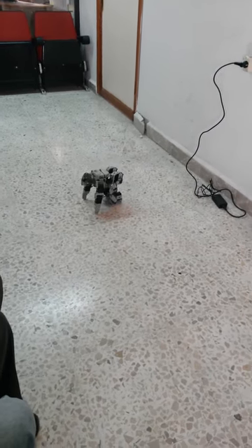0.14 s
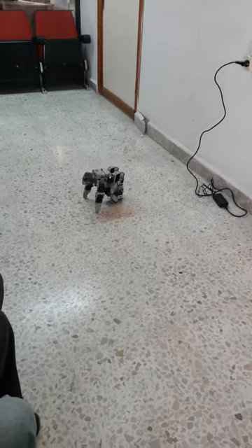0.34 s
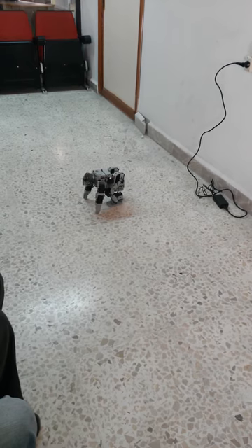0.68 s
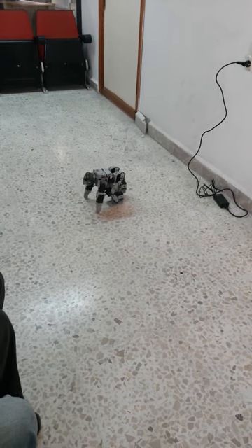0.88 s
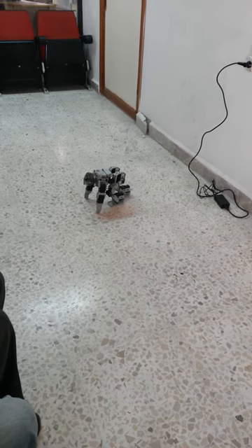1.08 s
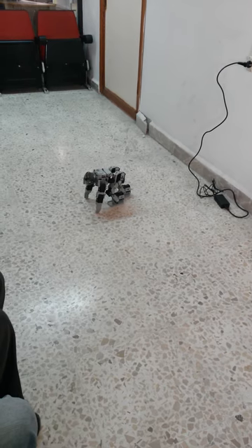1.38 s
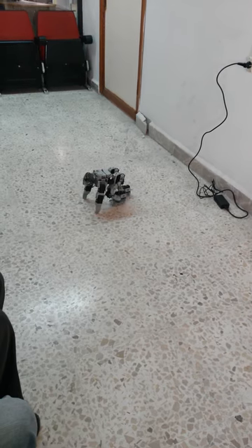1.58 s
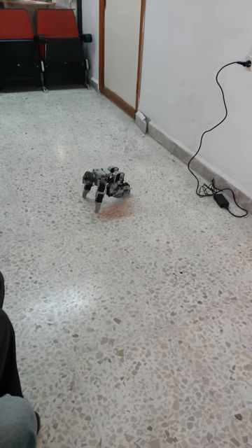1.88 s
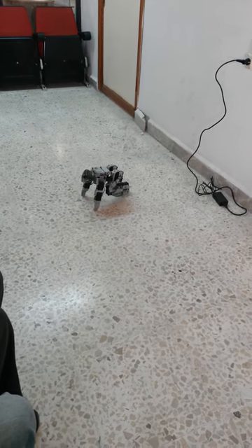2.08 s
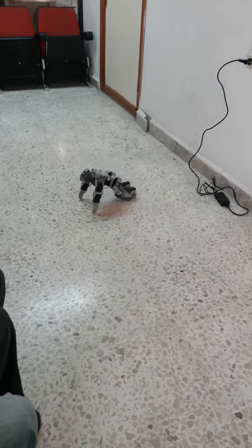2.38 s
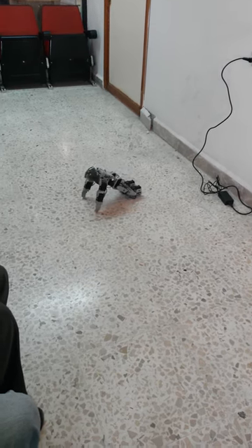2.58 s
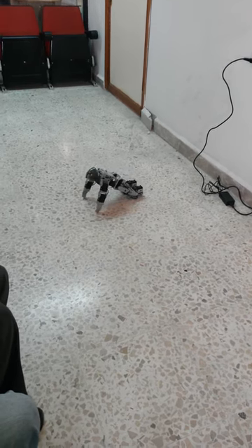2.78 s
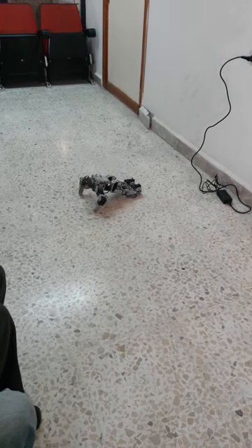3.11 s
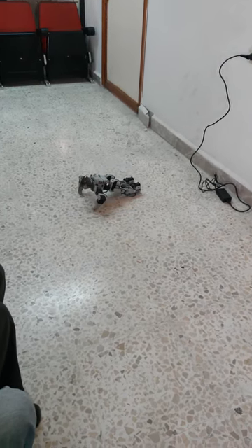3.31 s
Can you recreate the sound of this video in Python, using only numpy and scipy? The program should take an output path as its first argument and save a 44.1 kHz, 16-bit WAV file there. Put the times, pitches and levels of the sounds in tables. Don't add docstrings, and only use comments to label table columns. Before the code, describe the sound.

A small robot's plastic-cased servos make bright, rattling whirs with wavering gear whines, swelling and easing. A faint stroke comes near 0.5 s, a strong high one at 1.1 with soft foot knocks and a short drag, a softer one at 1.75. The loudest peaks at 2.4 with a scraping step, another strong whine follows at 3.05, then it fades. Bare room, faint house noise, phone two metres away.

```python
import sys
import numpy as np
from scipy import signal
from scipy.fft import rfft, irfft
from scipy.io import wavfile
from scipy.ndimage import uniform_filter1d, map_coordinates

SR = 44100
rng = np.random.default_rng(int(sys.argv[2]) if len(sys.argv) > 2 else 0)


def gain_from_db(level_db):
    decades = np.asarray(level_db, float) / 20
    return 10 ** decades


def log_audio(samples):
    frames = np.atleast_2d(samples).T
    limited = np.clip(frames, -1, 1)
    pcm = np.round(limited * 32767).astype(np.int16)
    wavfile.write(sys.argv[1], SR, pcm)


N = 152145
T = np.arange(N) / SR

# fastest moment, speed-up time and slow-down time in seconds, level in dB.
STROKES = [
    (-.1, .3, 0.34, -48.5),
    (0.498, 0.35, 0.3, -37.5),
    (1.088, .29, .38, -25.5),
    (1.758, 0.35, 0.34, -33),
    (2.388, 0.31, 0.37, -21.5),
    (2.549, 0.12, 0.027, -40.5),
    (3.058, 0.34, 0.32, -25),
    (3.7, 0.49, .3, -40),
]
# frequency in Hz, level in dB.
CASE_TONE = [(1000, -48.5), (1800, -27.5), (2300, -12), (3300, -8.5), (5000, -2), (7500, -1), (10000, -9),
             (14600, -20)]
# frequency in Hz, width in Hz, level in dB.
CASE_RINGS = [(6770, 300, -2.5), (4940, 900, -8)]
# frequency in Hz, level in dB.
GROAN_TONE = [(400, -26), (700, -5), (1000, -3.5), (1600, 2), (2300, -5.5), (3200, -38.5)]
# fastest moment, speed-up time and slow-down time in seconds,
# tooth-mesh pitch in Hz, strongest overtone in Hz.
WHINES = [
    (.47, .17, .3, 1245, 5000),
    (1.12, .22, .1, 2860, 4000),
    (1.13, .25, .09, 2300, 4600),
    (1.74, .19, .18, 1430, 5200),
    (2.38, .2, .1, 2440, 5400),
    (2.45, .1, .2, 2690, 6600),
    (2.5, .015, .08, 2700, 4600),
    (3.05, .19, .3, 2070, 5800),
]
WHINE_DB = [-43, -33, -31, -39, -29, -35, -24, -28]
# frequency in Hz, level in dB.
WHINE_TONE = [(1500, -14), (2100, -3), (2700, -5), (4000, 0), (6200, 2), (9000, 0)]
# start in seconds, length in seconds, thud level in dB, scrape level in dB.
FEET = [
    (1.009, 0.088, -54, -70.5),
    (1.094, 0.044, -42.5, -53),
    (1.218, 0.054, -45.5, -37),
    (1.514, 0.013, -49, -43.5),
    (2.347, 0.098, -35.5, -23),
    (2.522, 0.031, -42, -50),
    (2.98, 0.67, -53.5, -73),
]
# frequency in Hz, level in dB.
THUD_TONE = [(47, -70), (80, -15), (125, -1.5), (404, -11.5), (490, -10.5), (728, -11.5), (900, -23),
             (1170, -90), (1980, -120)]
# frequency in Hz, width in Hz, level in dB.
SCRAPE_RINGS = [(3200, 230, 21.5), (1830, 900, -42), (5750, 6000, 4)]
# start in seconds, end in seconds, frequency in Hz, width in Hz, level in dB.
HUMS = [(0.036, 0.506, 345, 30, -60), (1.11, 1.634, 640, 120, -54), (1.45, 2.55, 635, 59, -57.5),
        (0.96, 1.53, 775, 16, -56), (1.55, 2.12, 340, 32, -59), (1.5, 2.35, 97, 11, -66),
        (2.4, 3.6, 140, 10, -53), (2.4, 3.14, 185, 13.4, -54), (2.1, 2.96, 335, 60, -56),
        (2.45, 3.04, 610, 43, -61)]
# frequency in Hz, level in dB.
HOUSE_TONE = [(15, -31), (25, 5.5), (217, 3), (508, -3), (596, -5), (1220, -9), (4060, -20), (7300, -29),
              (14600, -21)]
# frequency in Hz, left minus right in dB.
PORT_TONE = [(60, 2), (110, -2), (200, 2), (380, 0), (690, 0), (1280, 2.0), (2360, -1), (4340, 8),
             (8010, -9), (14800, 8)]
# frequency in Hz, limit in dB.
BASS_LIMIT = [(50, -44), (300, -42), (1000, -41), (2000, -35), (3500, -33)]

ALIKE_HZ = 540


def unit(x):
    return x / np.sqrt(np.mean(x ** 2))


def colour(x, table, share=1):
    hz, db = np.array(table, float).T
    f = np.arange(N // 2 + 1) * SR / N + 1
    gain_db = np.interp(np.log(f + 50), np.log(hz + 50), db)
    return irfft(rfft(x) * gain_from_db(share * gain_db), N)


def ring(x, hz, width):
    return signal.lfilter(*signal.iirpeak(hz, hz / width, fs=SR), x)


def walk(rate):
    k = int(SR / rate)
    steps = np.repeat(rng.standard_normal(N // 8), k)[:N]
    return unit(uniform_filter1d(steps, k))


def eased(peak, rise, fall):
    x = np.where(T < peak, (peak - T) / rise, (T - peak) / fall)
    return np.cos(np.pi / 2 * np.clip(x, 0, 1)) + 1e-6


def burst(start, length):
    u = T - start
    attack = np.clip(u / 0.0013, 0, 1)
    sag = np.exp(-np.clip(u, 0, 9) / length)
    release = np.clip((length * 1.28 - u) / 0.01, 0, 1)
    return attack * sag * release


def house():
    mid, side = (colour(rng.standard_normal(N), HOUSE_TONE) for _ in range(2))
    side = colour(side, [(20, -12), (ALIKE_HZ / 4, -10), (ALIKE_HZ * 2, 0)])
    return unit(mid + side * np.array([[1], [-1]])) * gain_from_db(-57 + 0.5 * walk(3.88))


def hums():
    out = 0
    for start, end, hz, width, db in HUMS:
        tone = unit(ring(ring(rng.standard_normal(N), hz, width), hz, width))
        fade = np.clip(np.minimum((T - start) / 0.088, (end - T) / 0.11), 0, 1)
        out = out + gain_from_db(db + 2.0 * walk(12)) * fade * tone
    return out


def feet():
    grit = rng.standard_normal(N) * gain_from_db(walk(300))
    scrape = unit(sum(gain_from_db(db) * ring(grit, hz, width) for hz, width, db in SCRAPE_RINGS))
    thud = unit(colour(rng.standard_normal(N), [(20, -50)] + list(THUD_TONE) + [(1500, -60)]))
    thud = thud * gain_from_db(3 * walk(60))
    out = 0
    for start, length, thud_db, scrape_db in FEET:
        out = out + burst(start, length) * (gain_from_db(thud_db) * thud + gain_from_db(scrape_db) * scrape)
    return out


def whines():
    pitch_power, whine_power, wobble = .3, .7, .011
    flutter_db, fade_s = 4, .15
    overtone_db = -17
    out = 0
    for (peak, rise, fall, mesh_hz, best_hz), db in zip(WHINES, WHINE_DB):
        speed = eased(peak, rise, fall)
        pitch = mesh_hz * speed ** pitch_power * (1 + wobble * walk(400))
        turn = 2 * np.pi * np.cumsum(pitch) / SR
        stack = 0
        for k in range(1, 9):
            if k * mesh_hz < 11000:
                level_db = max(overtone_db * np.log2(k * mesh_hz / best_hz) ** 2, overtone_db)
                stack = stack + gain_from_db(level_db + flutter_db * walk(60)) * np.cos(k * turn + k * k)
        swell = eased(peak, min(rise, fade_s), min(fall, fade_s)) ** whine_power
        out = out + gain_from_db(db) * swell * stack
    return colour(out, WHINE_TONE)


def rattle():
    teeth_per_s, tooth_db, chatter_db = 6000, 1.5, .7
    speed_power = 1.59
    bright_db = 9.5
    groan_db, groan_lag_s = -29, .12
    speeds = [(eased(peak, rise, fall), db) for peak, rise, fall, db in STROKES]
    gain = np.sqrt(sum((gain_from_db(db) * v ** speed_power) ** 2 for v, db in speeds))
    speed = np.max([v for v, db in speeds], axis=0)

    knocks = (rng.random(N) < teeth_per_s / SR) * rng.standard_normal(N)
    knocks = knocks * gain_from_db(tooth_db * np.minimum(rng.exponential(1, N), 4))
    teeth = unit(knocks) + .7 * rng.standard_normal(N)
    rings = sum(gain_from_db(db) * ring(teeth, hz, width) for hz, width, db in CASE_RINGS)
    case = colour(teeth + rings, CASE_TONE)
    low = signal.sosfilt(signal.butter(2, 8000, fs=SR, output="sos"), case)
    case = low + (case - low) * gain_from_db(-bright_db * (0.5 - speed))

    lagging = np.interp(T - groan_lag_s, T, gain)
    groan = gain_from_db(groan_db) * lagging * unit(colour(teeth, GROAN_TONE))
    return (unit(case) * gain + groan) * gain_from_db(chatter_db * walk(12))


def room(robot):
    t = T[:SR // 2]
    mid, side = rng.standard_normal((2, N))
    side = colour(side, [(20, -14), (ALIKE_HZ / 4, -10), (ALIKE_HZ * 2, 0)])
    fade = gain_from_db(-60 * t / 0.22) * (t > .003)
    tail = np.array([mid + side, mid - side])[:, :len(t)] * fade
    tail = tail * gain_from_db(4) / np.sqrt(np.sum(tail ** 2) / 2)
    return signal.fftconvolve(robot[None], tail, axes=1)[:, :N]


def scene():
    robot = hums() + feet() + whines() + rattle()
    late = map_coordinates(robot, [(T - .00003) * SR], mode="mirror")
    return (np.array([late, robot]) + room(robot)) * gain_from_db(-5.5) + house()


def starve(x):
    frame, offset, band = 2048, 847, 4
    x = np.pad(x, ((0, 0), (frame - offset, frame)))
    f, _, z = signal.stft(x, SR, "cosine", frame)
    top = int(BASS_LIMIT[-1][0] * frame / SR) // band * band
    power = (np.abs(z[:, :top]) ** 2).reshape(2, -1, band, z.shape[2]).sum(axis=2)
    treble = np.sum(np.abs(z[:, top:]) ** 2, axis=1, keepdims=True)
    limit_db = np.interp(f[:top:band], *np.array(BASS_LIMIT, float).T)[:, None]
    limit_db = limit_db + 3 * rng.standard_normal(power.shape[1:])
    z[:, :top] *= np.repeat(power > treble * gain_from_db(2 * limit_db), band, axis=1)
    return signal.istft(z, SR, "cosine", frame)[1][:, frame - offset:][:, :N]


def top_cut(x):
    return signal.sosfilt(signal.butter(12, 15360, fs=SR, output="sos"), x)


def record(dry):
    ports = np.array([colour(dry[0], PORT_TONE, .5), colour(dry[1], PORT_TONE, -.5)])
    ports = signal.sosfilt(signal.butter(2, 45, "high", fs=SR, output="sos"), ports)
    ports = signal.sosfilt(signal.ellip(10, .3, 70, 14600, fs=SR, output="sos"), ports)
    mix = starve(ports)
    return top_cut(mix)


dry = scene()
out = record(dry)
log_audio(out)
```